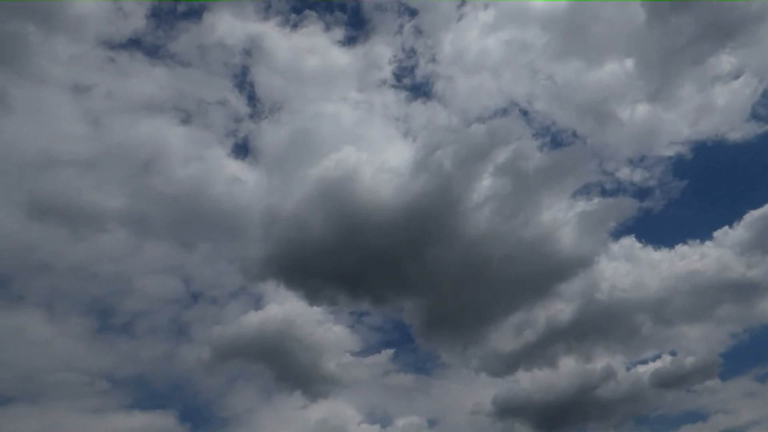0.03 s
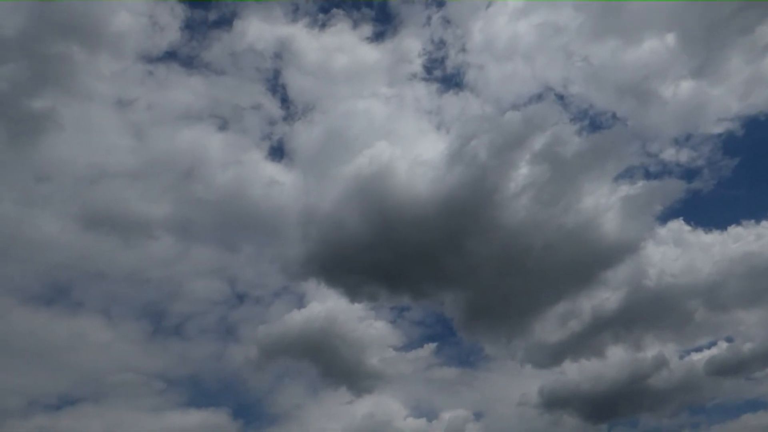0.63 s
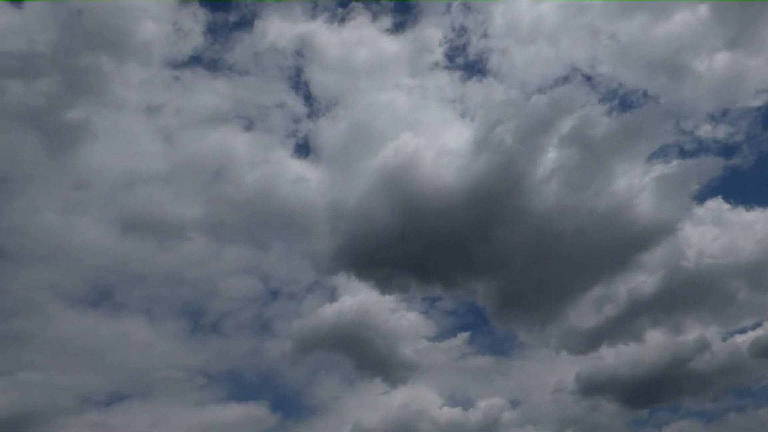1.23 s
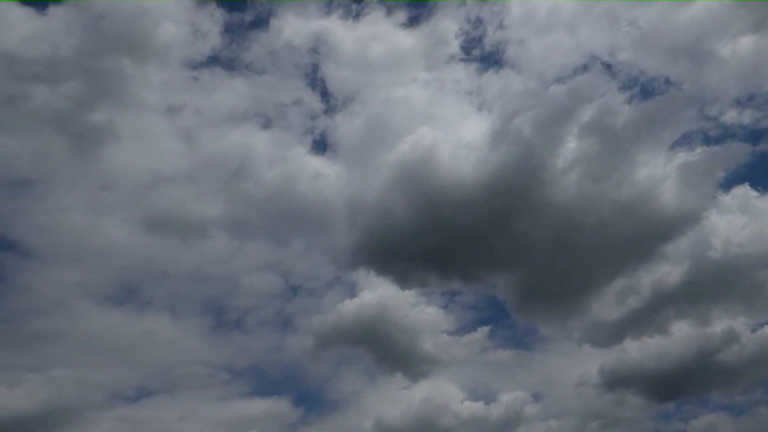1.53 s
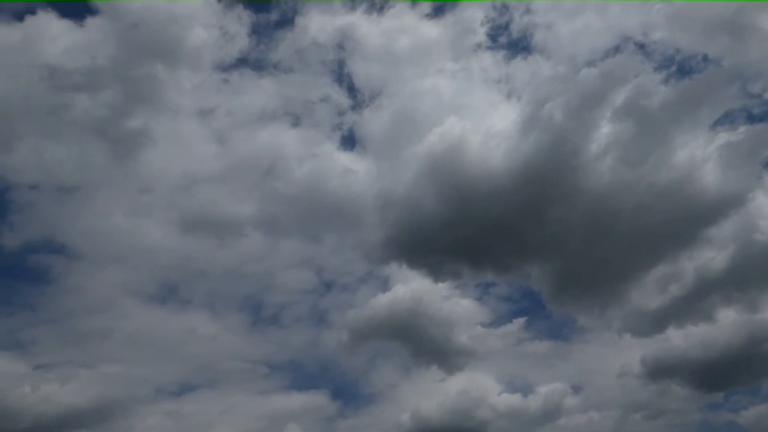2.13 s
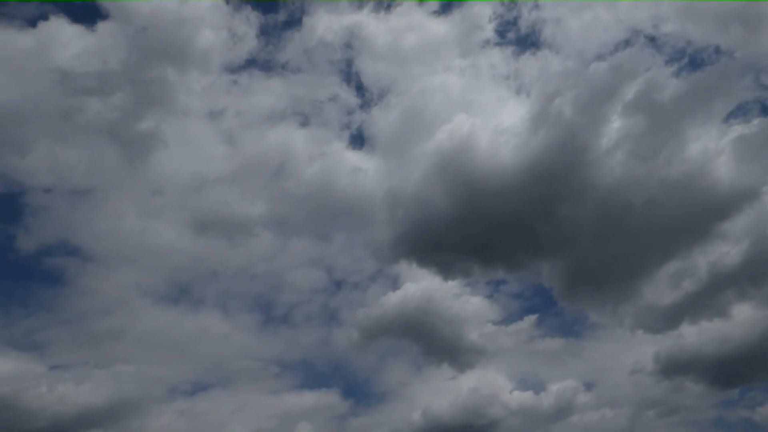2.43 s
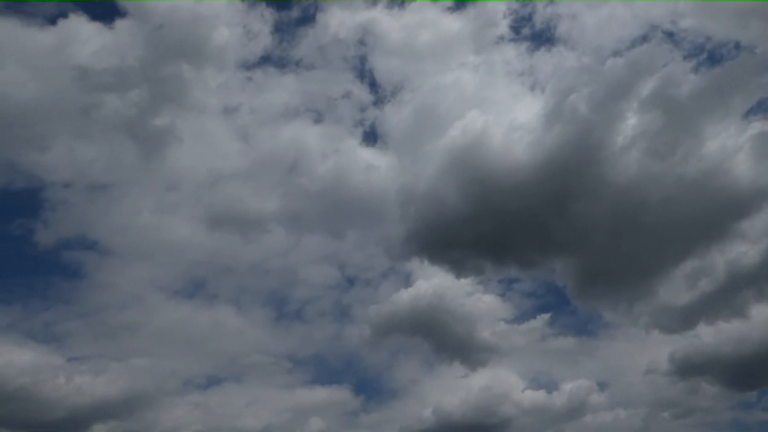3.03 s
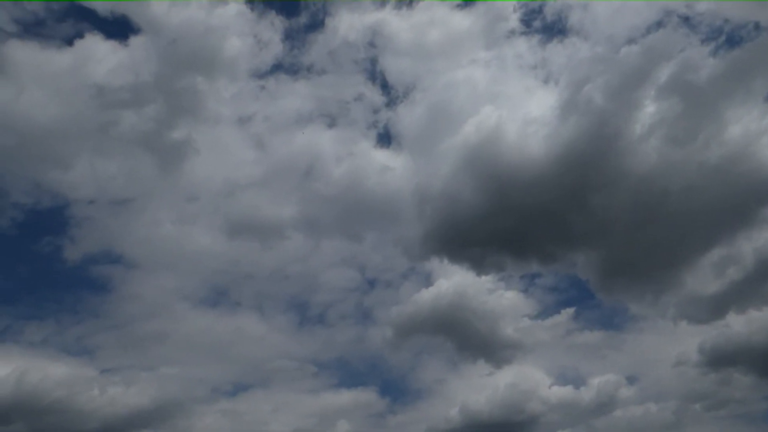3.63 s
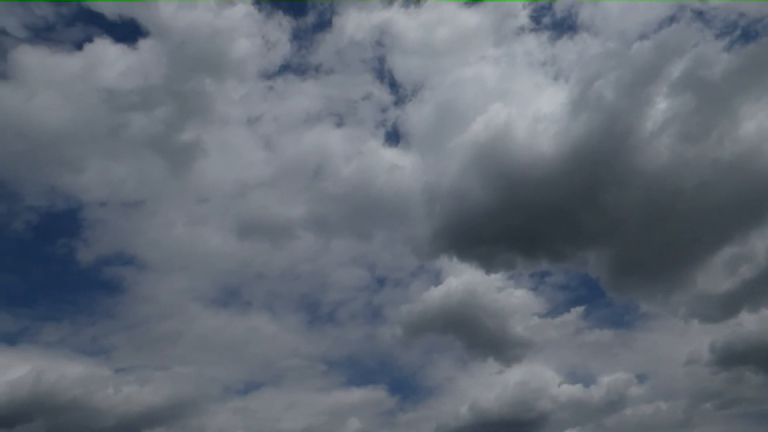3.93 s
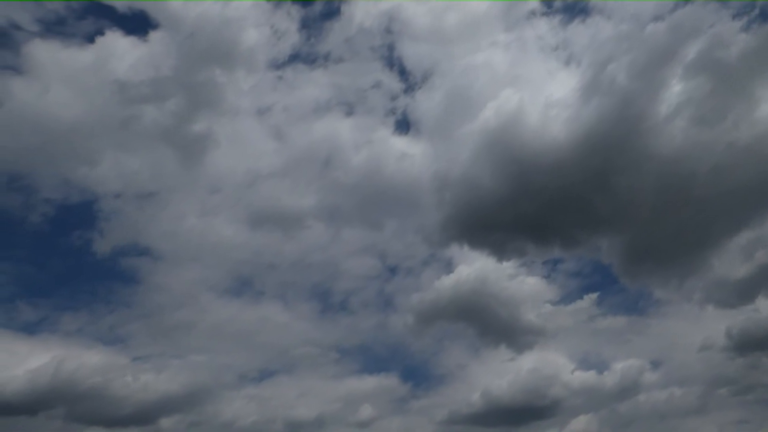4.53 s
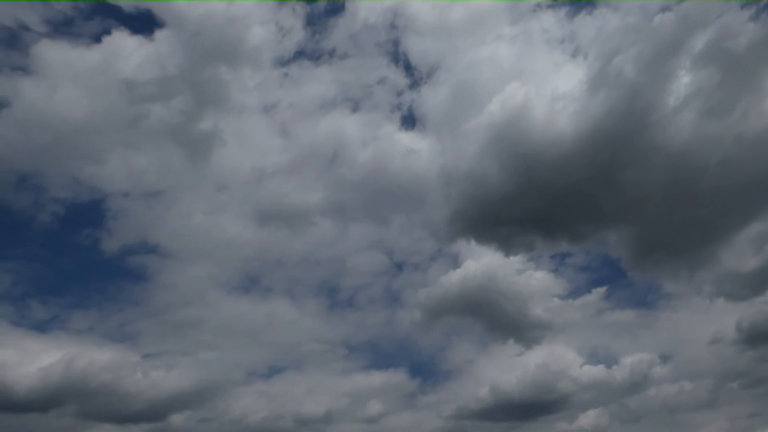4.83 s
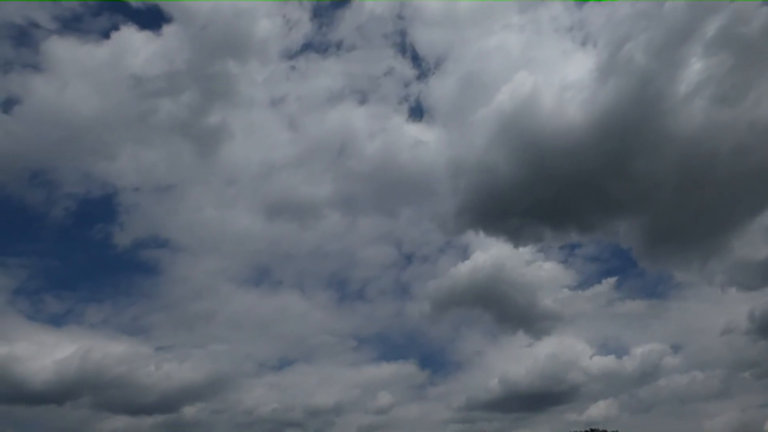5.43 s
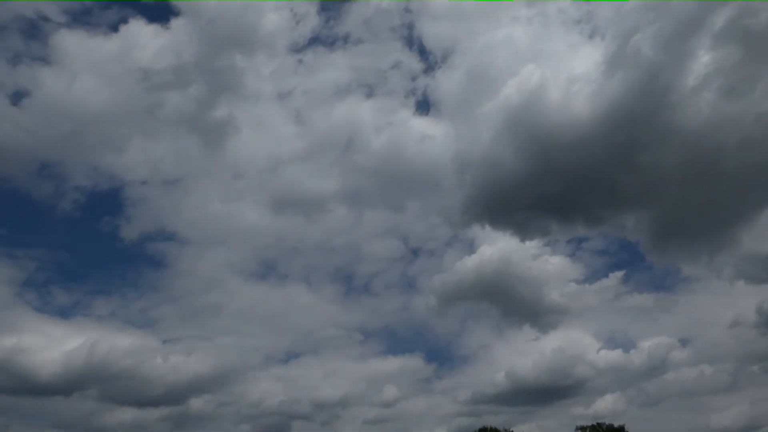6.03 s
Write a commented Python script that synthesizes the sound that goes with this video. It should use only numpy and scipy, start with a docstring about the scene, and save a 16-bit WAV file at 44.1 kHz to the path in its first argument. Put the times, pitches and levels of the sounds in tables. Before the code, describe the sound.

Small birds sing from distant trees over a quiet, steady outdoor hiss, slightly right of centre with a soft echo. In the first second, a quick run of high buzzes swells and fades among slurred whistles and trills, which stay busy until about 1.7 seconds. Light puffs of wind bump the microphone. At about 2.1 seconds a buzzard gives one clear mew overhead, leaping up and then sinking away by 2.8 seconds. Three fainter, far-off mews follow between 3.2 and 4.2 seconds, among thin chips and faint clucks. From about 3.6 seconds the wind builds, buffeting the microphone with low rumble and thumps that shift between left and right, with the hardest thumps around 4.5 seconds. A bird sings a short whistled phrase at 5.2 seconds and repeats it at 5.7. The wind rumble remains the loudest sound until the end, just past 6 seconds.

```python
"""Songbirds trill and buzz from distant trees, over the quiet hiss of open country and a camera microphone.
Each note is a gliding whistle of the syrinx, scattered by branches and softly echoed by foliage.
Two seconds in, a buzzard mews high overhead: one near, falling harmonic cry, then fainter mews far off.
Gusts buffet the two microphone ports with rumble and thumps, hardest in the last two seconds."""
import sys
import numpy as np
from scipy import signal
from scipy.fft import rfft, irfft, next_fast_len
from scipy.io import wavfile
from scipy.ndimage import uniform_filter1d, map_coordinates

SR = 44100
rng = np.random.default_rng(int(sys.argv[2]) if len(sys.argv) > 2 else 0)


def wav_out(sig):
    """Save sig, one row per channel (or a flat mono array), as 16-bit PCM at SR to the path in sys.argv[1]."""
    wavfile.write(sys.argv[1], SR, np.round(np.clip(np.atleast_2d(sig).T, -1, 1) * 32767).astype(np.int16))


N = 277830

# Open air and microphone hiss. Each row: frequency in Hz, relative density in dB.
AIR_SPECTRUM = [(18, -48), (30, -16), (111, -3), (156, -1.5), (263, -11), (389, -9), (454, -11),
                (655, -17.5), (1020, -14), (1380, -17.5), (1620, -22.5), (4420, -31), (4900, -30.5),
                (6200, -33), (10700, -34.5), (15500, -41.5)]
# Wind buffeting a port. Each row: frequency in Hz, relative density in dB.
BUFFET_SPECTRUM = [(25, -42), (40, -32), (60, -15), (86, -4.5), (150, 2.5), (240, -1), (335, -7),
                   (480, -14.5), (900, -32.5), (1500, -50.5), (3000, -82)]
# Fine turbulence at a port. Each row: frequency in Hz, relative density in dB.
FIZZ_SPECTRUM = [(400, -26), (1000, 2.5), (1800, -9), (3500, -19.5), (6000, -31), (10000, -66)]
# Stereo width of the air, the wind and the echo. Each row: frequency in Hz, side over mid in dB.
AIR_SIDE = [(100, -32), (400, -18), (800, -8), (1300, -5), (2200, -9.5), (5000, -7.5), (12000, -14.5)]
WIND_SIDE = [(40, -7.5), (150, -10.5), (280, -6.5), (400, -3), (650, 4), (950, 4.5), (1400, 0.5),
             (2200, -4)]
ECHO_SIDE = [(1000, 6), (2500, -19)]
# The right port is boomier. Each row: frequency in Hz, left over right in dB.
PORT_BALANCE = [(50, -12), (125, -6.5), (250, 3.5), (500, 8.5), (1200, 0.5)]
# The breeze freshens and swings. Each row: time in seconds, relative level in dB, left over right in dB.
BREEZE_COURSE = [(0, -59.5, -2.5), (1.75, -56, -0.5), (2.85, -58.5, -9), (3.4, -56.5, 4), (3.85, -46.5, 2),
                 (4.05, -42.5, -8), (4.28, -39.5, 11), (4.75, -33.5, -4.5), (5.02, -37.5, 2.5),
                 (5.38, -36, 3), (5.68, -37, -6.5), (5.95, -36, 9), (6.3, -33.5, -0.5)]
# Gusts. Each row: start in seconds, hold in seconds, relative level in dB, left over right in dB.
PORT_GUSTS = [(0.258, 0.59, -46.5, 0), (0.846, 0.34, -41.5, -12), (2.018, 0.23, -40.5, -8.5),
              (2.127, 0.035, -34, -10.5), (2.269, .15, -46, -12), (2.568, 0.035, -44, -17),
              (2.682, 0.077, -44.5, -17), (2.932, 0.034, -46.5, -8), (3.082, 0.27, -50, -5),
              (3.508, 0.028, -41.5, -22), (3.623, 0.096, -32.5, -6.5), (4.391, 0.33, -31.5, -8)]
# Eddies hit the microphone. Each row: start in seconds, relative peak in dB, left over right in dB.
EDDY_THUMPS = [(0.549, -42.5, 29), (1.821, -37, 17), (2.115, -35, 17), (2.914, -46, -13), (3.622, -47, -27),
               (3.706, -39, -9), (4.449, -43, -15), (4.508, -30.5, 17), (4.563, -44, 25),
               (4.615, -29, -3.5), (4.651, -45, 12)]
# Taps on the camera in the strongest gust. Each row: start in seconds, relative level in dB.
CAMERA_TICKS = [(4.451, -50), (4.533, -48.5)]
# The colour of a tap. Each row: frequency in Hz, gain in dB.
TICK_COLOUR = [(700, -6), (1500, 15.5), (2100, 15.5), (3200, -19), (9000, -38)]
# Echo from the trees. Each row: frequency in Hz, time to fall 60 dB in seconds.
FOLIAGE_DECAY = [(1000, 1), (3000, 0.73), (8000, 0.56)]
# Long, nearly level notes far off. Each row: start and length in seconds, pitch in Hz,
# relative level in dB, quaver and glide in Hz.
FAR_NOTES = [(0.115, 0.17, 3134, -71.5, 17, -220), (0.674, .15, 3060, -71, 20, -47),
             (1.159, .23, 3090, -70.5, 17, -100), (1.866, 0.24, 2936, -75, 50, -280),
             (2.228, .13, 7120, -76, 70, -200), (2.416, .12, 7300, -77, 80, -70),
             (3.026, 0.13, 3930, -76, 92, 202), (4.057, 0.3, 3920, -74, 140, 57),
             (4.266, 0.17, 2700, -68.5, 130, 200), (4.953, 0.41, 2790, -67.5, 106, 114)]
# Soft clucks far off. Each row: start in seconds, relative level in dB.
FAR_CLUCKS = [(.15, -70), (.275, -75), (1.596, -68.5), (3.039, -71), (3.277, -69.5), (3.397, -70.5),
              (3.875, -72), (5.078, -69), (5.518, -74), (6.18, -69)]
# Runs of thin chips. Each row: start, end and spacing in seconds, top and bottom pitch in Hz,
# relative level in dB.
FALLING_CHIPS = [(1.35, 2.15, .107, 5680, 3920, -76.5), (3.195, 3.6, .168, 5750, 4550, -77.5),
                 (3.53, 4.15, .425, 4020, 2830, -72), (3.69, 4.12, .172, 6080, 4550, -73)]
# Slurred whistles in the trees. Each row: start and length in seconds, first, middle and last pitch
# in Hz, relative level in dB.
SLURRED_NOTES = [(0.047, 0.061, 4700, 4770, 4540, -66.5), (0.202, 0.059, 2770, 2175, 1850, -62),
                 (0.345, 0.053, 2670, 2620, 2310, -64.5), (0.404, 0.02, 3050, 2746, 2570, -54),
                 (0.714, 0.039, 3150, 4180, 4200, -58), (0.932, 0.02, 4320, 4130, 3900, -60.5),
                 (0.948, 0.049, 2700, 2713, 2950, -59), (1.078, 0.042, 3070, 2570, 2250, -62.5),
                 (1.16, 0.064, 2090, 2190, 2160, -60), (1.301, .045, 5520, 5660, 5600, -70),
                 (1.328, 0.06, 1780, 1710, 1620, -73.5), (1.609, 0.029, 3650, 2930, 2910, -56),
                 (1.636, 0.017, 2150, 2250, 2400, -54.5), (2.646, 0.17, 2830, 2956, 2546, -74),
                 (3.253, 0.085, 4000, 3590, 2810, -71), (4.508, .08, 1586, 1630, 1640, -66.5),
                 (4.879, 0.074, 1800, 1620, 1700, -68), (5.996, 0.026, 3740, 3140, 2530, -62.5),
                 (6.11, 0.13, 2440, 2740, 2693, -72)]
# Trills in the trees. Each row: start and length in seconds, first and last pitch in Hz,
# relative level in dB, swing in Hz.
TRILLED_NOTES = [(0.145, 0.079, 1840, 2850, -68.5, 180), (0.516, 0.09, 2150, 2200, -65.5, 170),
                 (0.788, 0.11, 2375, 2304, -64, 131), (1.033, 0.062, 3136, 3200, -54, 358),
                 (1.205, 0.072, 2176, 2254, -61, 132), (1.466, 0.07, 2320, 2730, -60.5, 80),
                 (1.522, 0.052, 3050, 3790, -53.5, 400), (3.722, 0.082, 2606, 2740, -67.5, 200),
                 (4.401, 0.051, 5060, 4420, -73, 447), (4.652, 0.0806, 2226, 2530, -64.5, 191),
                 (4.82, 0.06, 2280, 2023, -59.5, 90), (5.424, 0.06, 2570, 2860, -63, 120),
                 (6.04, 0.053, 2600, 3400, -63, 130)]
# A rasp and two arched whistles, doubled by the lower side of the syrinx. Each row: offset from the first
# whistle and length in seconds, first, middle and last pitch in Hz, relative level in dB, swing in Hz.
MOTIF_NOTES = [(-.075, .06, 4900, 4160, 3980, -68.5, 620), (-.036, .035, 4500, 4250, 3680, -62, 330),
               (0, .05, 3150, 3960, 3850, -52, 20), (.006, .058, 2600, 3230, 2670, -65, 20),
               (0.042, .068, 3880, 3870, 3680, -57, 100), (0.125, .048, 3450, 3815, 2660, -56.5, 14.8),
               (.128, .06, 3250, 2600, 1970, -71, 20)]
# The motif is sung twice. Each row: time in seconds, gain in dB, stretch factor, swell in dB per second.
MOTIF_REPEATS = [(5.216, -3.3, .97, 29), (5.686, .2, 1.08, -25)]
# Mews far off. Each row: start and length in seconds, first, middle and last pitch in Hz,
# relative level in dB.
DISTANT_MEWS = [(3.239, .23, 2193, 2164, 1997, -67), (3.442, 0.23, 2080, 1860, 1746, -64),
                (3.865, .29, 1820, 2123, 2140, -66)]
# The near mew overhead. Each row: time in seconds, pitch of the strong second harmonic in Hz.
MEW_PITCH = [(2.088, 2231), (2.128, 2546), (2.174, 2670), (2.286, 2364), (2.446, 2228), (2.626, 1854),
             (2.748, 1840), (2.84, 1597)]
# The buzzard's throat. Each row: harmonic number, relative level in dB.
MEW_HARMONICS = [(1, -9), (2, -2), (3, -18), (4, -21), (5, -30)]


def amp(db):
    """Decibels to gain."""
    return 10 ** (np.asarray(db) / 20)


def unit(x):
    """x at rms 1."""
    return x / np.sqrt(np.mean(x ** 2) + 1e-20)


def along(points, hz):
    """Interpolate (Hz, value) points on a log axis."""
    freqs, values = np.transpose(points)
    return np.interp(np.log(hz + 1), np.log(freqs + 1), values)


def curves(rows):
    """One value per sample for each column after the time."""
    times, *columns = np.transpose(rows)
    return [np.interp(np.arange(N) / SR, times, column) for column in columns]


def wobble(rate, size=N):
    """A smooth random curve, rate knots a second."""
    knots = rng.standard_normal(int(size * rate / SR) + 4)
    return map_coordinates(knots, [np.arange(size) * rate / SR])


def filtered(x, response):
    """x shaped by a frequency response."""
    size = next_fast_len(N + SR // 2)
    return irfft(rfft(x, size) * response(np.fft.rfftfreq(size, 1 / SR)), size)[..., :N]


def noise(spectrum):
    """Two unrelated coloured noises of rms 1."""
    return unit(filtered(rng.standard_normal((2, N)), lambda hz: amp(along(spectrum, hz))))


def add(track, s, sound):
    """Mix a sound into a track from s seconds."""
    part = track[..., max(0, round(s * SR)):][..., :sound.shape[-1]]
    part += sound[..., :part.shape[-1]]


def stereo(ports, width):
    """The camera makes left and right from the sum and the shaped difference of its ports."""
    mid = (ports[0] + ports[1]) / np.sqrt(2)
    side = filtered(ports[0] - ports[1], lambda hz: amp(along(width, hz))) / np.sqrt(2)
    return np.array([mid + side, mid - side])


def open_air(drift_db=0.52, hiss_above_hz=2500):
    """A faint wash of open country drifts slowly under a steady microphone hiss."""
    bed = stereo(noise(AIR_SPECTRUM), AIR_SIDE)
    wash = filtered(bed, lambda hz: 1 / (1 + (hz / hiss_above_hz) ** 4))
    hiss = bed - wash
    return amp(-60) * (amp(drift_db * wobble(2.085)) * wash + hiss)


def port_shares(lean_db):
    """How wind pressure divides between the left and right port."""
    gain = amp(np.array([[.5], [-.5]]) * lean_db)
    return gain / np.sqrt(np.mean(gain ** 2, axis=0))


def wind_strength(attack_s=0.013, release_s=0.036):
    """The flow at each port: the breeze, plus gusts that rise, hold and die away."""
    t = np.arange(N) / SR
    breeze_db, lean_db = curves(BREEZE_COURSE)
    power = (amp(breeze_db) * port_shares(lean_db)) ** 2
    for s, hold, db, lean in PORT_GUSTS:
        shape = np.exp(-np.maximum(s - t, 0) / attack_s - np.maximum(t - s - hold, 0) / release_s)
        power += (amp(db) * port_shares(lean) * shape) ** 2
    return np.sqrt(power)


def wind_on_microphone(lump_db=3.0, spurt_db=1.5, thump_rise_s=0.0048, rumble_below_hz=420):
    """Turbulence presses on each port separately, in lumps and sudden thumps."""
    strength = wind_strength()
    pressure = strength * unit(amp(lump_db * np.array([wobble(70), wobble(70)])))
    age = np.arange(SR // 10) / SR / thump_rise_s
    for s, db, lean in EDDY_THUMPS:
        add(pressure, s, amp(db) * port_shares(lean) * age * np.exp(1 - age))
    buffet = amp(-1) * noise(BUFFET_SPECTRUM)
    rumble = filtered(buffet, lambda hz: 1 / (1 + (hz / rumble_below_hz) ** 4))
    # small eddies come in short spurts and grow faster with the gust than large ones
    force = np.sqrt(np.mean(strength ** 2, axis=0)) / amp(-36)
    spurts = pressure * unit(amp(spurt_db * wobble(130))) * force ** 0.3
    fizz = filtered(spurts * rng.standard_normal((2, N)), lambda hz: amp(along(FIZZ_SPECTRUM, hz) - 22))
    ports = pressure * rumble + spurts * (buffet - rumble) + fizz
    return stereo(filtered(ports, lambda hz: port_shares(along(PORT_BALANCE, hz))), WIND_SIDE)


def camera_ticks(decay_s=0.0016):
    """Tiny dry taps on the camera, right at the microphone."""
    out, t = np.zeros(N), np.arange(SR // 20) / SR
    for s, db in CAMERA_TICKS:
        add(out, s, amp(db) * np.exp(-t / decay_s) * rng.standard_normal(len(t)))
    return filtered(out, lambda hz: amp(along(TICK_COLOUR, hz)))


def foliage_echo(x, onset_s=0.028):
    """Distant foliage returns a diffuse echo whose treble dies first."""
    hz, t, spectra = signal.stft(rng.standard_normal((2, SR)), SR, nperseg=256)
    decay = amp(-60 * t / along(FOLIAGE_DECAY, hz)[:, None])
    tail = signal.istft(spectra * decay * (1 - np.exp(-t / onset_s)), SR, nperseg=256)[1]
    echo = signal.fftconvolve(x[None], tail / np.linalg.norm(tail[0]), axes=1)[:, :N]
    return stereo(echo, ECHO_SIDE)


def through_branches(x, spread_s, direct):
    """Branches split a far voice into many close paths; direct is the power share that comes straight."""
    t = np.arange(SR // 10) / SR
    paths = rng.standard_normal(len(t)) * np.exp(-t / spread_s)
    scattered = signal.fftconvolve(x, paths / np.linalg.norm(paths))[:N]
    return np.sqrt(direct) * x + np.sqrt(1 - direct) * scattered


def whistle(length, start_hz, middle_hz, end_hz, swing_hz=0, trill_rate=0, *,
            jitter, flutter_db=3.3, edge=0.27):
    """One syrinx note: a bent glide with an optional trill, swelling and fading."""
    t = np.arange(int(length * SR)) / SR
    u = t / length
    # a parabola through the three pitches
    glide = start_hz * (1 - u) * (1 - 2 * u) + middle_hz * 4 * u * (1 - u) + end_hz * u * (2 * u - 1)
    hz = glide * (1 + jitter * wobble(248.7, len(t))) + swing_hz * np.sin(2 * np.pi * trill_rate * t)
    swell = signal.windows.tukey(len(t), 2 * edge) * amp(flutter_db * wobble(71.8, len(t)))
    return np.sqrt(2) * swell * np.sin(2 * np.pi * np.cumsum(hz) / SR)


def far_singers(chorus_rate=6, chorus_hz=2996):
    """Far back in the trees, long quavering notes stand over a faint chorus of chance slurs."""
    out = np.zeros(N)
    for s, length, hz, db, quaver, glide in FAR_NOTES:
        note = whistle(length, hz - glide / 2, hz, hz + glide / 2, quaver, trill_rate=47,
                       jitter=0.0145, flutter_db=2.5, edge=0.086)
        add(out, s, amp(db) * note)
    for s in np.arange(0, N / SR, 1 / chorus_rate):
        pitches = chorus_hz * np.exp(.2 * rng.standard_normal() + 0.087 * rng.standard_normal(3))
        add(out, s + rng.random() / chorus_rate, amp(-76.5) * whistle(.09, *pitches, jitter=0.029))
    return out


def clucks():
    """A far bird gives hoarse little upward blips just above one kilohertz."""
    out = np.zeros(N)
    for s, db in FAR_CLUCKS:
        blip = whistle(0.0174, 1105, 1208, 1560, swing_hz=144, trill_rate=273, jitter=0.057)
        add(out, s, amp(db) * blip)
    return out


def chips(length_s=0.062):
    """Quick, hoarse down-sweeps come from the trees at an even pace."""
    out = np.zeros(N)
    for first, until, gap, top, bottom, db in FALLING_CHIPS:
        for s in np.arange(first, until, gap):
            chip = whistle(length_s, top, (top + bottom) / 2, bottom, swing_hz=267, trill_rate=240,
                           jitter=0.0458, edge=0.053)
            add(out, s, amp(db) * chip)
    return out


def buzzes(first_s=.109, gap_s=.1148, length_s=0.0527, peak_s=.71, swell_s=0.34, flick_rate=92):
    """A small bird's nine buzzes swell and fade; each drops from high up into five fast upward flicks."""
    t = np.arange(int(length_s * SR)) / SR
    progress = t / length_s
    out = np.zeros(N)
    for s in first_s + gap_s * np.arange(9):
        below_peak_db = 16 * (1 - np.exp(-((s - peak_s) / swell_s) ** 2))
        # the falling lead-in only speaks when the bird sings hard
        lead_in = whistle(0.038, 6600, 6030, 4800, swing_hz=280, trill_rate=450, jitter=0.0305)
        add(out, s - 0.017, amp(-68 - 1.3 * below_peak_db) * lead_in)
        flick = (np.cumsum(flick_rate * (1 + 0.071 * wobble(58, len(t)))) / SR) % 1
        hz = 4650 + 1150 * flick ** 1.3 + 90 * (.5 - progress) + 120 * wobble(296, len(t))
        # a flick weakens as it climbs
        flick_db = 0.5 * progress - 9 * flick ** 2 + 0.6 * wobble(90, len(t))
        envelope = np.sin(np.pi * flick) * signal.windows.tukey(len(t), .3) * amp(flick_db)
        buzz = unit(envelope * np.sin(2 * np.pi * np.cumsum(hz) / SR))
        add(out, s, amp(-54 - below_peak_db) * buzz)
    return out


def warblers():
    """Songbirds in the trees whistle phrases of slurred and trilled notes."""
    out = np.zeros(N)
    for s, length, start, middle, end, db in SLURRED_NOTES:
        add(out, s, amp(db) * whistle(length, start, middle, end, jitter=0.0058, edge=0.12))
    for s, length, start, end, db, swing in TRILLED_NOTES:
        note = whistle(length, start, (start + end) / 2, end, swing, trill_rate=58,
                       jitter=0.012, flutter_db=3.5, edge=0.15)
        add(out, s, amp(db) * note)
    return out


def motif_singer():
    """One bird sings its motif, then repeats it a little slower."""
    out = np.zeros(N)
    for s, call_db, stretch, swell in MOTIF_REPEATS:
        for after, length, *pitches, db, swing in MOTIF_NOTES:
            note = whistle(stretch * length, *pitches, swing, trill_rate=130, jitter=0.0095, edge=0.096)
            add(out, s + stretch * after, amp(call_db + swell * after + db) * note)
    return out


def far_mews():
    """From far off only the strong harmonic of a mew reaches the microphone."""
    out = np.zeros(N)
    for s, length, *pitches, db in DISTANT_MEWS:
        add(out, s, amp(db) * whistle(length, *pitches, jitter=0.021, flutter_db=2.5, edge=0.095))
    return out


def buzzard(glide_s=.025, attack_s=0.013, hold_s=0.12, fade_s=0.49, release_s=.07, dull_hz=4900):
    """Overhead, a clean harmonic cry leaps up and sinks; moving air makes each harmonic flutter."""
    # the throat rounds off every turn of pitch
    fundamental_hz = uniform_filter1d(curves(MEW_PITCH)[0], int(glide_s * SR)) / 2
    t = np.arange(N) / SR - MEW_PITCH[0][0]
    remaining = MEW_PITCH[-1][0] - MEW_PITCH[0][0] - t
    fade = np.sin(np.pi / 2 * np.clip((t - hold_s) / fade_s, 0, 1)) ** 2
    envelope = amp(-54.5 - 16 * fade) * np.clip(t / attack_s, 0, 1) * np.clip(remaining / release_s, 0, 1)
    phase = 2 * np.pi * np.cumsum(fundamental_hz * (1 + 0.0016 * wobble(200))) / SR
    cry = sum(amp(db + 3.5 * wobble(30)) * np.sin(k * phase) for k, db in MEW_HARMONICS)
    # the long way through the air dulls the top harmonics
    return filtered(np.sqrt(2) * cry * envelope, lambda hz: 1 / np.sqrt(1 + (hz / dull_hz) ** 10))


def scene():
    """Birds at their distances, just right of centre, heard from a microphone standing in the wind."""
    mew = buzzard()
    cluck = amp(10.5) * clucks()
    buzz = through_branches(buzzes(), spread_s=0.0036, direct=0.8)
    phrases = through_branches(warblers() + motif_singer(), spread_s=0.0093, direct=0.71)
    chorus = through_branches(far_singers(), spread_s=0.02, direct=0.4)
    song = amp(-1.5) * (phrases + chorus)
    far_mew = amp(-2) * through_branches(far_mews(), spread_s=0.015, direct=0.18)
    chip = amp(2.5) * through_branches(chips(), spread_s=0.0048, direct=0.19)
    birds = (mew + far_mew + chip + buzz + song + cluck) * amp([[-.55], [.55]])
    echo = foliage_echo(amp(-26) * mew + amp(-7.5) * (far_mew + chip) + amp(-11) * buzz
                        + amp(-8.5) * song + amp(-21.5) * cluck)
    return birds + echo + camera_ticks() + wind_on_microphone() + open_air()


def record(dry, notch_hz=388, width_hz=45, top_hz=15650):
    """The camera notches the low mids and keeps nothing above its band limit."""
    def notch(hz):
        return 1 - 1.09j * hz * width_hz / (notch_hz ** 2 - hz ** 2 + 1j * hz * width_hz)
    fades = signal.windows.tukey(N, .0007)  # the sound fades briefly in and out
    return filtered(filtered(dry, notch) * fades, lambda hz: hz < top_hz)


dry = scene()
out = record(dry)
wav_out(out)
```